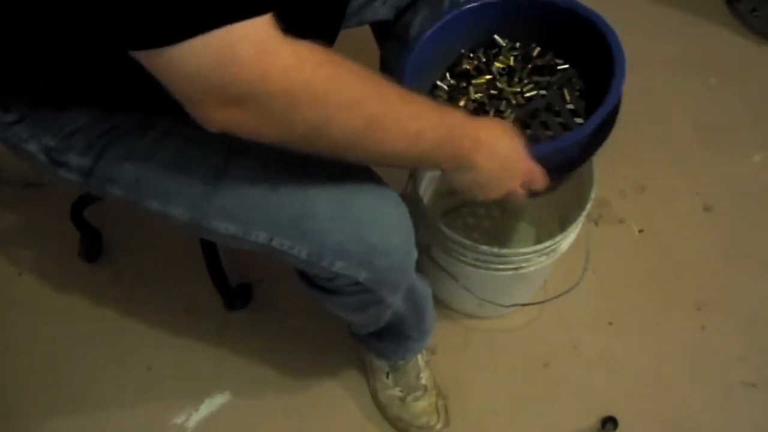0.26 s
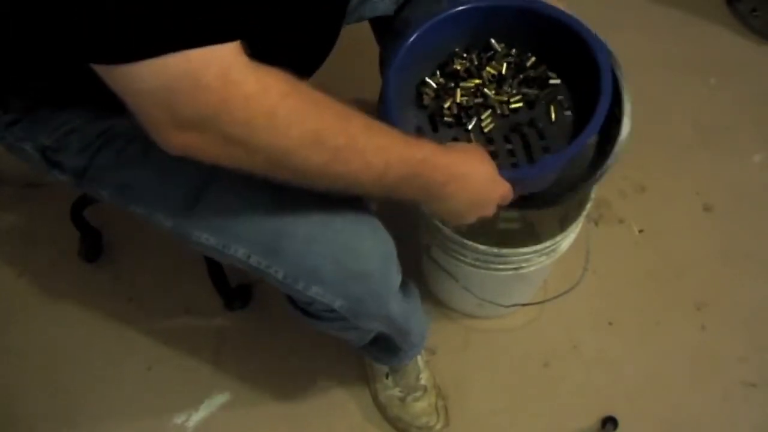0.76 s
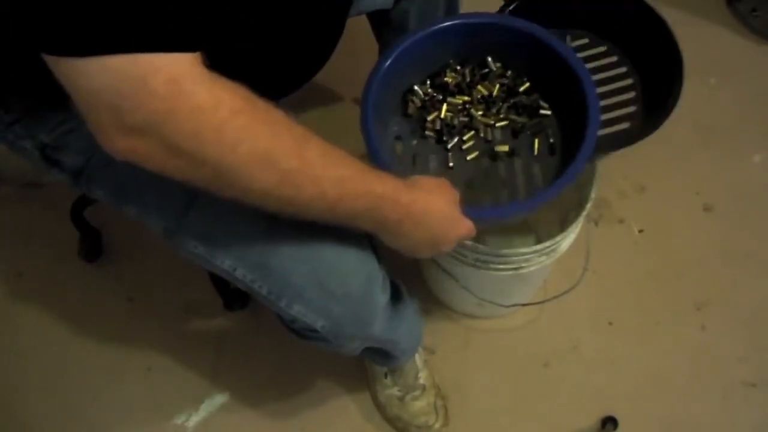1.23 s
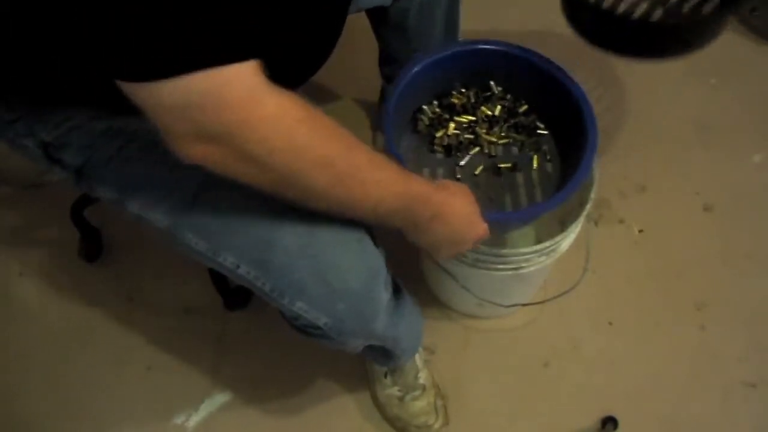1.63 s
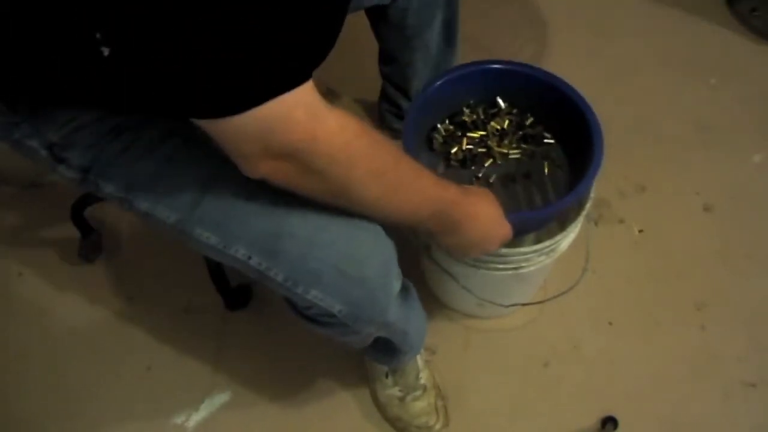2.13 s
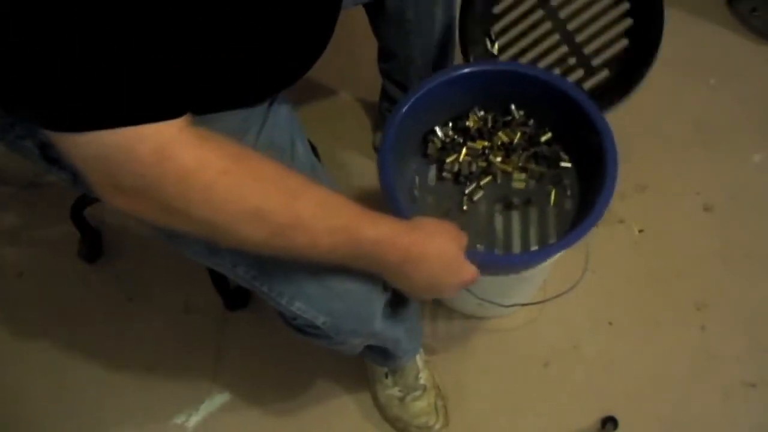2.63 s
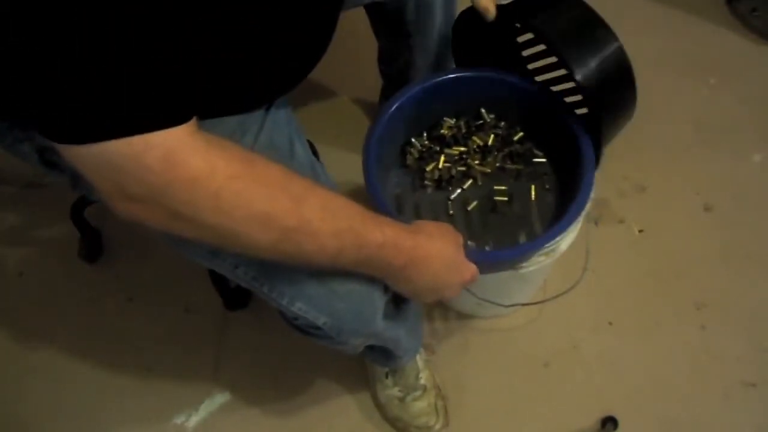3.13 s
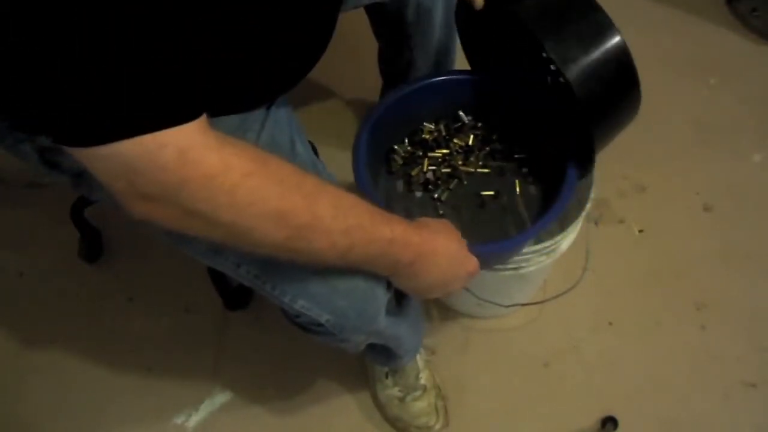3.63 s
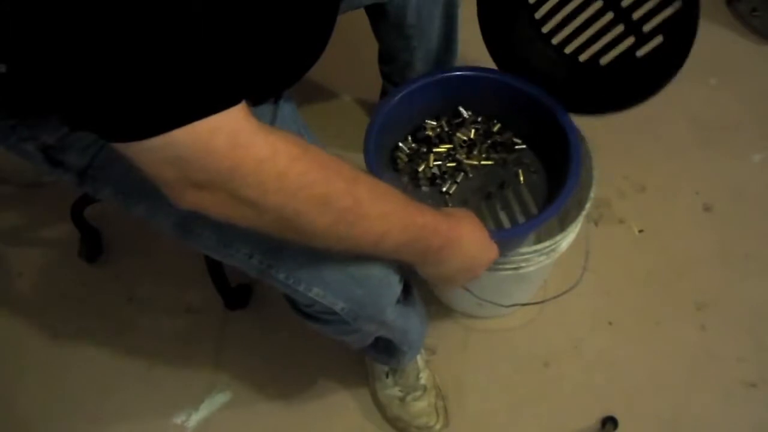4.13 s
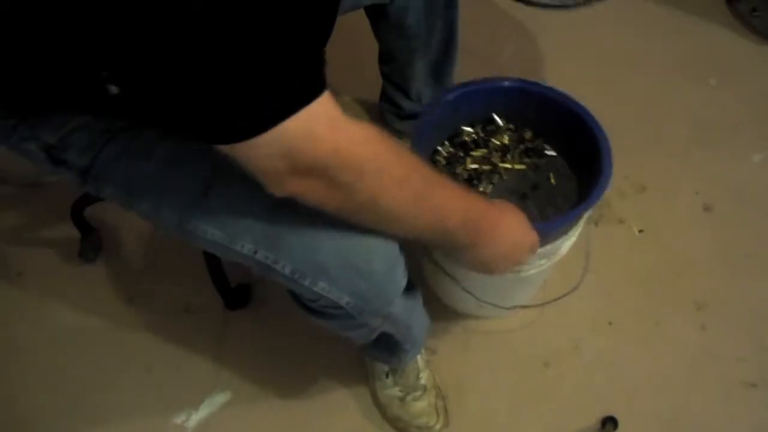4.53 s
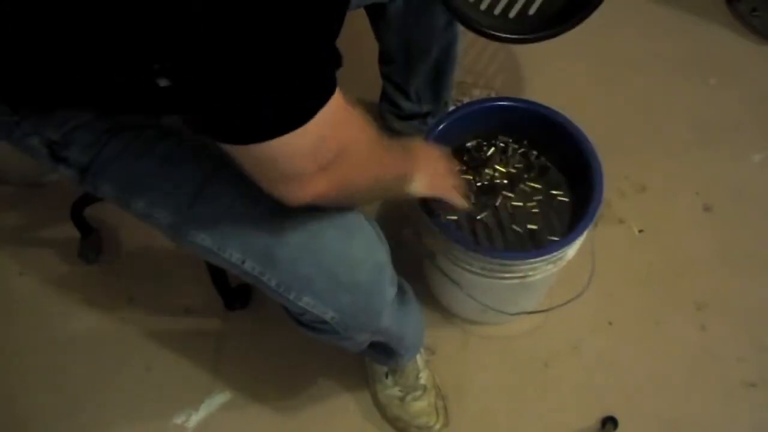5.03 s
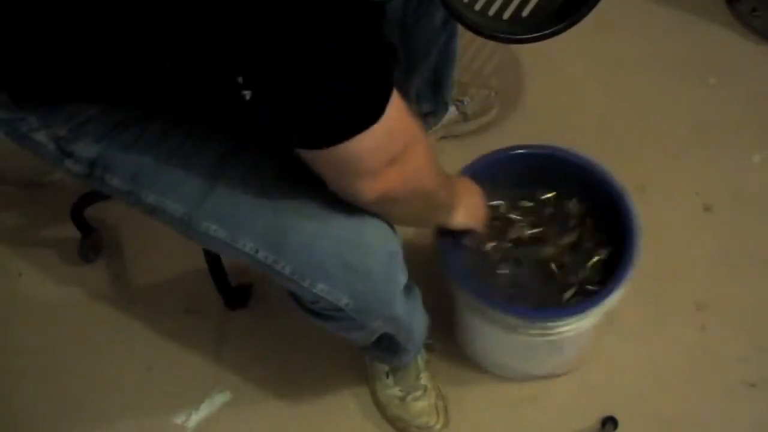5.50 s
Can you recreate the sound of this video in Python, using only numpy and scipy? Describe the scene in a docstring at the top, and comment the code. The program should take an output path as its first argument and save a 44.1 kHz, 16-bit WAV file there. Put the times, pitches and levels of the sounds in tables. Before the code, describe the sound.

Close stereo sound in a small, lightly echoing room: brass cartridge cases in a hard plastic tray over a plastic bucket. From 0 to 1 s, light, crisp rattling with separate clacks and bright ticks, ending in a high ring. Around 1.0 to 1.7 s it nearly stops, with only a few faint clinks. At about 1.8 s a loud, hollow double knock brings a burst of clatter, then weaker taps until 2.2 s. Another lull follows, with sparse ticks and thin ringing. From 2.8 to 4.1 s a long, dense rattle runs, sharp at first, then lower and boomier, with bucket knocks, soft floor bumps and a short scrape near 3.8 s. A pause follows to 4.5 s. Small scrapes lead to a hard clack at 4.7 s, then cases jingle and tumble with hollow thuds, brightening and swelling from 5.4 s and still rattling at the cut near 5.8 s.

```python
"""Brass cases in a plastic tray

Brass cartridge cases rattle in a hard plastic tray that is tipped, knocked and set down on a bucket in a small room.
Each jolt throws a shower of tiny impacts that excite decaying modes of tray, bucket and thin case walls, and a
broadband crack; sliding sustains the hail between jolts. Clinks, high throbbing rings, two faint thin whines,
floor bumps and rim scrapes join in over a faint hush, and two close microphones hear it all."""
import sys
import numpy as np
from scipy import signal
from scipy.fft import rfft, irfft, next_fast_len
from scipy.io import wavfile

SR = 44100
rng = np.random.default_rng(int(sys.argv[2]) if len(sys.argv) > 2 else 0)


def digitize_waveform(pressure):
    """Quantize a signal to 16-bit integers and store it at the path in sys.argv[1].

    Rows of a 2-D input are taken as channels; values are limited to [-1, 1].
    """
    field = np.atleast_2d(pressure).T
    bounded = np.clip(field, -1, 1)
    quanta = np.round(bounded * 32767).astype(np.int16)
    wavfile.write(sys.argv[1], SR, quanta)


N = 254016
TIME = np.arange(N) / SR  # s
SIZE = next_fast_len(N + SR)  # samples in a spectrum, with room for a 1 s echo
HZ = np.arange(SIZE // 2 + 1) * SR / SIZE
LEFT_RIGHT = np.array([[1], [-1]])


def undb(db):
    """Logarithmic level: decibels to amplitude gain."""
    return 10 ** (np.asarray(db) / 20)


def along(table, column=1):
    """Logarithmic pitch scale: one column of a table by frequency, interpolated at every frequency."""
    table = np.transpose(table)
    return np.interp(np.log(HZ + 1), np.log(table[0]), table[column])


def over_time(table, t):
    """Linear interpolation: every column of a table by time, read at the times t."""
    s, *columns = np.transpose(table)
    return [np.interp(t, s, column) for column in columns]


def sides(pan_db):
    """Level-difference stereo: left and right gains of a place, given left minus right."""
    return undb(LEFT_RIGHT * pan_db / 2)


def ring(x, hz, t60):
    """Damped resonance: every impact starts a wave that falls 60 dB in t60 seconds."""
    r = np.exp(-np.log(1000) / (t60 * SR))
    return signal.lfilter([1, 0, -1], [1, -2 * r * np.cos(2 * np.pi * hz / SR), r * r], x) / 2


def band(x, hz, width):
    """Heavily damped resonance: a broad pass band with steep sides."""
    edges = [hz - width / 2, hz + width / 2]
    return signal.sosfilt(signal.butter(2, edges, "bandpass", fs=SR, output="sos"), x)


def radiated(x, order, hz):
    """Radiation limit: a body small against the wavelength radiates little below hz."""
    return signal.sosfilt(signal.butter(order, hz, "highpass", fs=SR, output="sos"), x)


def impacts(per_s, scatter_db):
    """Random point process: one-sample impacts of uneven size and either sign, rms 1."""
    happens = rng.random(N) < per_s / SR
    size = undb(scatter_db * rng.standard_normal(N))
    x = happens * rng.choice([-1, 1], N) * size
    return x / x.std()


def unit(body):
    """Impulse-response energy: scale that brings a body to rms 1 under a steady hail of rms 1."""
    tick = np.zeros(SR // 2)
    tick[0] = 1
    return 1 / np.sqrt(np.sum(body(tick) ** 2))


def struck(force, hz, t60, per_s, knock=0):
    """Modal excitation: a mode hit at its own random moments, and by given knocks."""
    def mode(x):
        return ring(x, hz, t60)
    return unit(mode) * mode(force * impacts(per_s, scatter_db=2.0) + knock)


def patchy(depth_db, per_s):
    """Random modulation: a slowly wandering gain with per_s random turning points a second."""
    knots = rng.standard_normal(int(per_s * N / SR) + 2)
    return undb(depth_db * np.interp(np.arange(N) * per_s / SR, np.arange(len(knots)), knots))


# left-right correlation of echo and hush: pitch_hz, likeness (0 to 1)
LIKENESS_BY_PITCH = [(60, 0.95), (630, 0.93), (1370, 0.98), (3010, 0.81), (6580, 0.16), (14400, 0.15)]


def pair_of_noises():
    """Interchannel coherence: spectra of two noises, alike in the bass and nearly unrelated in the treble."""
    mid, side = rfft(rng.standard_normal((2, SIZE)))
    likeness = np.clip(along(LIKENESS_BY_PITCH), 0, 1)
    return np.sqrt((1 + likeness) / 2) * mid + np.sqrt((1 - likeness) / 2) * side * LEFT_RIGHT


# relative noise density of the hush: pitch_hz, density_db (per Hz)
HUSH_SPECTRUM = [(24, -57.5), (40, -4.5), (372, -13), (565, -12.5), (2170, -26.5), (2460, -13.5),
                 (3140, -25), (13000, -28), (14000, -24.5)]
# level of the hush, which sinks after the loud knocks: start_s, level_db
HUSH_LEVEL = [(0, -55), (1.7, -58.5), (2.5, -64.5), (4.298, -68.5), (4.47, -77.5), (5.76, -82)]


def hush():
    """Spectrally shaped noise: a faint, steady background that slowly sinks."""
    noise = irfft(pair_of_noises() * undb(along(HUSH_SPECTRUM)), SIZE)[:, :N]
    return undb(over_time(HUSH_LEVEL, TIME)[0]) * noise / noise.std()


# plastic ribs of the tray: pitch_hz, relative level_db, t60_s
TRAY_RIBS = [(937, 3.5, 0.016), (1122, 8.5, 0.0091), (1340, 4, 0.0083), (1514, 1.5, 0.057),
             (1712, 7.5, 0.0088), (1875, -1.5, 0.026), (2030, -4, 0.02), (2126, 3.5, 0.0089),
             (2393, -0.5, 0.059), (2510, 2, 0.021), (2642, -3, 0.16), (2790, 4, 0.0091), (2948, -1, 0.025),
             (3353, -2, 0.0088), (3520, 6.5, 0.0043), (3790, -3.5, 0.017), (4155, -1, 0.033),
             (4420, -3.5, 0.021), (4910, 2.5, 0.0046), (5460, -2, 0.015), (5960, -8, 0.021),
             (7160, -11.5, 0.035), (7160, -10, 0.037)]


def ribs(hz, below_octaves):
    """Spectral spread of excitation: share of power that each rib takes from a clack of pitch hz."""
    near_octaves, above_octaves, far_share = .22, 2.9, 0.95
    octaves = np.log2(np.array(TRAY_RIBS)[:, :1] / hz)
    near = np.exp(-.5 * (octaves / near_octaves) ** 2)
    reach = np.where(octaves < 0, below_octaves, above_octaves)
    share = near + far_share * np.exp(-.5 * (octaves / reach) ** 2)
    return share / share.sum(axis=0)


def tray(forces, knocks):
    """Modal synthesis: ribs clack at their own pitches and places, now this one busy, now that."""
    out = np.zeros((2, N))
    for (hz, db, t60), force, knock in zip(TRAY_RIBS, forces, knocks):
        place = sides(2.5 * rng.standard_normal())
        out += place * undb(db) * struck(force * patchy(4, per_s=40), hz, t60, per_s=280, knock=knock)
    return out


# how tray and load lie: start_s, slide clack pitch_hz, slide boom_db, slide crack_db, reach below a clack in octaves,
# drive of the upper bucket modes_db, thump relative to boom_db, case ring relative to crack_db
LIE_OF_LOAD = [(0, 2350, -35, -4, 0.34, 2, 1, 6), (.45, 2240, -50, -3, 0.88, 9.5, -3, -2.5),
               (.7, 2200, -48.5, -21, 0.76, -15.5, -11, 0), (.95, 2250, -61, -12, 0.75, -15, -3, 4),
               (1.5, 2380, -23, -4.5, 0.37, -13, 1, -6), (1.8, 1700, -17, -4.5, 0.74, 2.5, -8.5, -2),
               (2.2, 1605, -10, -33, 0.41, -2.6, -13.5, -24), (2.6, 2450, -48, -15.5, 0.23, -0.5, -6, -1),
               (2.82, 2100, -49, -25, 0.45, 1, -13, 5.5), (3.05, 2060, -35, 1, 0.41, -25, -3, 4),
               (3.3, 1720, -34, -9, 0.43, 1, -9, -2), (3.5, 1470, -3, -43, 0.48, 6, -11, -3),
               (3.65, 1717, -11, -9, 1, -3.5, -8.5, 0.5), (4.1, 1726, -7.5, -10.5, 0.38, -0.5, -5, 0.5),
               (4.5, 1160, -4, -34, 0.71, -7.5, -3.5, 6.5), (4.7, 2600, -13, 1, 0.65, -15.5, 0.5, 11),
               (4.95, 2300, -31, -1, 0.42, 6.5, -29, 4.5), (5.05, 1950, -15, -8, 0.69, 4, 1.5, -7),
               (5.3, 1920, -13.5, -1.5, 0.69, -4.5, -5, 9.5), (5.76, 2190, -19.5, -0.5, 1, -1.5, -2, 7.5)]


def shares(t, hz, ribs_db, boom_db, crack_db):
    """Power partition among ribs, thump, bucket, crack and cases; thump follows boom, ring follows crack."""
    *_, below_octaves, _, thump_db, ring_db = over_time(LIE_OF_LOAD, t)
    rest_db = np.array([boom_db + thump_db, boom_db, crack_db, crack_db + ring_db]).reshape((4, -1))
    return np.vstack([ribs(hz, below_octaves) * undb(ribs_db) ** 2, undb(rest_db) ** 2])


# sliding and rolling: start_s, relative level_db
SLIDING = [(0, -32), (.08, -34.5), (.14, -35.5), (.3, -28), (.58, -35), (.74, -44), (.83, -30.5),
           (.99, -34), (1.07, -83), (1.43, -76), (1.54, -41), (1.7, -85), (1.81, -24), (1.99, -37.5),
           (2.11, -68), (2.2, -35), (2.3, -63), (2.57, -73.5), (2.65, -47), (2.81, -47), (2.89, -32.5),
           (3.03, -31.5), (3.15, -39.5), (3.27, -35), (3.38, -34.5), (3.54, -54), (3.63, -26.5),
           (3.95, -30.5), (4.19, -61), (4.46, -80), (4.53, -63.5), (4.6, -76), (4.68, -20), (4.8, -32.5),
           (5.0, -42.5), (5.16, -42.5), (5.23, -31.5), (5.41, -33), (5.5, -32), (5.6, -22), (5.72, -21),
           (5.76, -17)]
# jolts: start_s, relative level_db, clack pitch_hz, bucket boom_db, hard crack_db, shower decay_s
# (boom and crack are relative to the jolt's level)
JOLT_EVENTS = [(0.028, -35, 1910, -43, 8, 0.024), (0.045, -31.5, 2400, -40, 9, 0.054),
               (0.17, -14.5, 3150, -44, -13, 0.012), (0.221, -23, 3310, -44, 1, .02),
               (0.226, -16.5, 3380, -47, 2.5, 0.019), (0.262, -26, 3100, -43, -21, 0.022),
               (0.284, -30, 3140, -29, -11, .01), (0.313, -19, 3620, -40, 6.5, 0.016),
               (0.36, -32, 2460, -46.5, 10.5, 0.013), (0.397, -30, 3570, -47, 6, 0.016),
               (0.468, -24, 3710, -53, 6.5, 0.0089), (0.53, -35.5, 1390, -44, 9.5, 0.0091),
               (0.563, -21.5, 2980, -47, -5.5, 0.021), (0.668, -27.5, 2030, -40, -25, 0.029),
               (0.764, -21.5, 2510, -46, -5.5, 0.027), (0.771, -14, 3150, -46, -10.5, 0.024),
               (0.845, -16, 2730, -50, -8.5, 0.0072), (0.881, -24, 2750, -53, -33, 0.0031),
               (0.913, -17.5, 4180, -45, -2.3, 0.021), (1.146, -51.5, 2010, -39, -24, 0.011),
               (1.227, -33, 3140, -45, -24, 0.0084), (1.244, -32.5, 2780, -42, -13, 0.027),
               (1.457, -27, 2580, -30, 1.5, 0.0086), (1.476, -32, 2560, -42, -0.5, 0.021),
               (1.496, -28, 2520, -50, -1, 0.012), (1.519, -28, 1830, -41, 0, 0.0069),
               (1.572, -26.5, 2880, -55, -0.5, 0.005), (1.581, -24, 2280, -47, -6.5, 0.031),
               (1.768, -20.5, 2205, -8.5, -11, 0.024), (1.776, -10, 2140, -19, -8.5, 0.025),
               (1.788, -5, 1610, -10.5, -40, 0.0059), (1.839, -6, 1690, -11, -3, 0.01),
               (1.842, -7.5, 1770, -22, -5.5, 0.028), (2.032, -29.5, 2400, -20.5, -44, 0.0086),
               (2.056, -27, 2760, -30, -44.5, 0.021), (2.129, -25, 1710, -23, -1.5, 0.017),
               (2.136, -16, 1660, -9.5, -36, 0.03), (2.259, -37.5, 1340, -1.5, -41, 0.0046),
               (2.41, -52, 2400, -43, -10, 0.011), (2.526, -45.5, 1980, -23.5, -2.5, 0.013),
               (2.59, -29.5, 2920, -48, -8, 0.026), (2.591, -34, 2500, -47, -6, .006),
               (2.7, -37, 3540, -37, -5, .012), (2.744, -40, 2380, -48, -3.5, 0.019),
               (2.77, -33.5, 2370, -46, -11, 0.0086), (2.821, -21, 2600, -44, -6.5, 0.037),
               (2.863, -19, 2110, -52, -12, 0.0086), (2.895, -9, 2130, -32.5, -9, 0.015),
               (2.997, -11.5, 1730, -36, -13, 0.015), (3.027, -12.5, 2400, -34, -7.5, 0.051),
               (3.099, -16.5, 2290, -44, -15, 0.022), (3.187, -18, 1700, -20.5, -9, 0.012),
               (3.214, -28, 1670, -12, -24, 0.0086), (3.301, -16, 1800, -30, -9.5, 0.011),
               (3.357, -5.5, 1470, -15.5, -16.5, 0.0086), (3.369, -24, 1530, -15, -8, 0.031),
               (3.422, -31.5, 1320, -12, -22, 0.026), (3.485, -32.5, 1320, -9, -25, 0.007),
               (3.548, -19, 1650, -16, -2, 0.06), (3.585, -16, 2120, -21, -21, 0.041),
               (3.589, -16.5, 1320, -11, -6.5, 0.052), (3.656, -19, 1610, -8, -2, 0.03),
               (3.685, -11, 1020, -19.5, -4, 0.014), (3.777, -11.5, 1610, -11, -9.5, 0.009),
               (3.823, -24, 1290, -10.5, -6, 0.0095), (3.841, -10.5, 1000, -25.5, -7, 0.0097),
               (3.897, -19, 4020, -25, -4, 0.048), (3.921, -31, 1210, -8.5, -4.5, 0.016),
               (3.926, -18, 1270, -13.5, -4, 0.023), (4.087, -21.5, 2100, -20.5, -6.5, 0.0088),
               (4.091, -16, 1830, -19, -13.5, 0.037), (4.491, -44, 4250, -35, -9, 0.041),
               (4.511, -36.5, 2870, -8.5, -10.5, 0.17), (4.617, -27.5, 2570, -31, -2, 0.014),
               (4.623, -22.5, 2580, -37, 1.5, 0.037), (4.632, -20, 2760, -20, -11, 0.043),
               (4.646, -15.5, 2500, -13, -9, 0.017), (4.711, -15.5, 2700, -19.5, -14, 0.012),
               (4.685, -4.5, 2750, -19.5, -4, 0.0089), (4.904, -23.5, 2370, -15, -0.5, 0.014),
               (4.994, -31, 1520, -14, -7, 0.016), (5.041, -20.5, 2000, -19, -9, 0.036),
               (5.066, -18.5, 2100, -9, -31, 0.0023), (5.184, -18.5, 2050, -13, -4, 0.01),
               (5.279, -13, 1760, -14, -7.5, 0.005), (5.302, -23, 1760, -21, -11, 0.0066),
               (5.397, -20, 1920, -23, -4.5, 0.17), (5.448, -17.5, 2330, -16.5, -22, 0.064),
               (5.566, -17, 4340, -7.5, 2.5, 0.028), (5.632, -18.5, 2200, -12.5, 0, 0.046),
               (5.69, -23, 2200, -6, -6, .01), (5.745, -25, 1800, -6, -3, 0.023)]


def excitation():
    """Addition of powers: the slide's hail plus a swelling, dying shower per jolt, and the first knocks."""
    swell_share = 0.079  # swell time constant as a share of the decay
    ribs_db, rib_scatter_db, first_db = -4, 1.5, 7.5
    hz, boom_db, crack_db, *_ = over_time(LIE_OF_LOAD, TIME)
    power = shares(TIME, hz, 0, boom_db, crack_db) * undb(over_time(SLIDING, TIME)[0]) ** 2
    scatter = rib_scatter_db * rng.standard_normal((len(JOLT_EVENTS), len(TRAY_RIBS), 1))
    knocks = np.zeros((len(TRAY_RIBS), N))
    for (at, db, hz, boom_db, crack_db, decay), spot_db in zip(JOLT_EVENTS, scatter):
        i = int(at * SR)
        u = TIME[i:i + SR // 4] - TIME[i]
        # the crowd lands just behind the first case, the last ones bounce after it
        shower = (1 - np.exp(-u / (swell_share * decay))) * np.exp(-u / decay)
        share = shares(at, hz, ribs_db + spot_db, boom_db, crack_db) * undb(db) ** 2
        power[:, i:i + len(u)] += share * shower ** 2
        # the first case knocks all ribs at once
        knocks[:, i] = np.sqrt(share[:len(TRAY_RIBS), 0]) * undb(first_db)
    return np.sqrt(power), knocks


# broad bands of the hard crack: pitch_hz, width_hz, relative level_db
CRACK_BANDS = [(3900, 6200, 6.5), (5020, 4100, 19), (6300, 2200, 18), (7030, 2800, -31.5),
               (10300, 3300, 9.5)]


def crack(x):
    """Broadband impact noise: brass striking brass and plastic."""
    return sum(undb(db) * band(x, hz, width) for hz, width, db in CRACK_BANDS)


# thin brass case walls: pitch_hz, relative level_db, t60_s
CASE_MODES = [(6740, -8.5, 0.077), (7560, -4.5, 0.01), (8020, -8, 0.034), (7950, -3, 0.022),
              (8580, -6, .03), (8300, 1, 0.027), (9300, -15, 0.055), (8770, -1.5, 0.026),
              (8800, -29, 0.032), (9210, -1, 0.038), (10320, 0, 0.039), (9700, -0.5, 0.027),
              (10880, -1, 0.035), (11600, -0.5, 0.036), (9800, -20.5, 0.068), (11350, -0.5, 0.085),
              (12200, 2.5, 0.04), (11200, -0.5, 0.038), (12380, -9.5, .04), (13000, -3.5, .06),
              (13100, -1.5, .06), (13500, -22.5, .06), (14000, -40, .06)]


def cases(force):
    """Modal synthesis with detuning: two cases of every size ring, each at its own place and pitch."""
    pan_scatter_db, pitch_scatter = 5, .012  # pitch scatter as a share of the pitch
    chance = rng.standard_normal((2 * len(CASE_MODES), 2))
    out = np.zeros((2, N))
    for (hz, db, t60), (place, tune) in zip(CASE_MODES * 2, chance):
        tuned_hz = hz * (1 + pitch_scatter * tune)
        out += sides(pan_scatter_db * place) * undb(db) * struck(force, tuned_hz, t60, per_s=84)
    return out


SEATED_S = 4.45  # from here on the tray sits in the bucket's mouth
# whole-bucket modes: pitch_hz
THUMP_PITCHES = [180, 222, 270, 340]
# for each of these pitches: relative level_db, t60_s, change once the tray is seated_db
THUMP_MODES = [(-11.5, 0.065, 8), (-7, 0.081, -7), (-5, 0.038, -1.5), (-11.5, 0.0073, 8.5)]


def thump(x):
    """Low-order modes: the bucket as a whole jarred against the floor."""
    seated = np.arange(len(x)) / SR > SEATED_S
    return sum(undb(db + seated_db * seated) * ring(x, hz, t60)
               for hz, (db, t60, seated_db) in zip(THUMP_PITCHES, THUMP_MODES))


# air column and walls of the bucket: pitch_hz
BUCKET_PITCHES = [400, 462, 530, 646, 676, 705, 764, 920, 1021, 1194, 1324, 1560, 1679, 1761, 2170, 603,
                  1250, 1380, 1615]
# for each of these pitches: relative level_db, t60_s, change once the tray is seated_db
BUCKET_MODES = [(-14, 0.0058, 16.5), (2, 0.11, -3.5), (3.5, 0.028, 0.5), (4, 0.16, -4), (0.5, 0.13, -2.5),
                (-6.5, 0.044, 10.5), (-5.5, 0.28, -1), (-2.5, 0.059, 1), (-4, 0.11, -7), (-12, 0.09, -1),
                (-2.5, 0.14, -17), (-2.5, .08, -3), (4, 0.14, -15.5), (-19.5, 0.078, 6), (-1, 0.065, 4),
                (-16.5, 0.028, 12), (-16.5, .1, -10.5), (-13.5, 0.12, -1), (-10, 0.24, -3)]


def bucket(x):
    """Coupled cavity and wall modes: struck at ever-changing spots, the upper ones driven as the load lies."""
    upper = x * undb(over_time(LIE_OF_LOAD, TIME)[4])
    out = np.zeros(N)
    for hz, (db, t60, seated_db) in zip(BUCKET_PITCHES, BUCKET_MODES):
        force = upper if hz > 600 else x
        gain = undb(db + seated_db * (TIME > SEATED_S))
        out += gain * ring(patchy(3, per_s=20) * force, hz, t60)
    return out


# reverberation of the room: pitch_hz, t60_s, echo level_db
ROOM_WALLS = [(153, 0.076, 1.5), (400, 0.25, -7), (1000, 0.35, -3.5), (2760, 0.36, -13), (7280, 0.14, -7),
              (14000, 0.36, -2.5)]


def room():
    """Diffuse reverberation: response of direct sound plus a noise echo that decays octave by octave."""
    delay_s = 0.0033
    noise, t, echo = pair_of_noises(), np.arange(SR) / SR, np.zeros((2, SIZE))
    t60 = along(ROOM_WALLS)
    for hz in 62.5 * 2. ** np.arange(9):
        octave = np.cos(np.pi / 2 * np.clip(np.log2((HZ + 1) / hz), -1, 1)) ** 2
        fade = 1000. ** (-t / t60[int(hz * SIZE / SR)]) * (t > delay_s)
        echo[:, :SR] += irfft(noise * octave, SIZE)[:, :SR] * fade / np.sqrt(np.sum(fade ** 2))
    return 1 + undb(along(ROOM_WALLS, column=2)) * rfft(echo)


# one spot of tray or bucket chattering under a few cases: start_s, pitch_hz, relative level_db, length_s
CLINK_EVENTS = [(0.026, 2850, -35, 0.044), (0.047, 2400, -36, 0.021), (.075, 3450, -26.5, 0.029),
                (0.076, 1920, -38, 0.047), (0.168, 1870, -26.5, 0.023), (.225, 3780, -28, 0.048),
                (0.227, 3095, -22, 0.062), (0.232, 6300, -28, .03), (.40, 3520, -28.5, 0.013),
                (0.541, 5670, -26.5, 0.021), (0.58, 2820, -54, 0.053), (0.627, 2490, -37.5, 0.065),
                (.63, 4950, -40, 0.09), (0.661, 1990, -34.5, 0.051), (.23, 800, -33.5, .06),
                (0.769, 2260, -28, 0.079), (0.885, 2650, -23, 0.015), (0.941, 1950, -36.5, 0.11),
                (1.228, 3050, -35.5, 0.026), (1.458, 2660, -40, 0.02), (1.799, 662, -16, 0.015),
                (1.836, 674, -27, 0.022), (1.575, 1830, -39, 0.061), (1.59, 2580, -38, 0.04),
                (1.795, 1666, -21.5, 0.081), (1.849, 1688, -8, 0.016), (1.88, 1676, -29, 0.09),
                (1.782, 860, -23, 0.022), (2.149, 648, -32.5, 0.09), (2.135, 1020, -30.5, 0.044),
                (2.14, 1650, -35, .05), (2.26, 1273, -33.5, 0.011), (2.027, 2330, -34, 0.023),
                (2.593, 1885, -44.5, 0.077), (2.62, 2400, -46, 0.079), (2.741, 2340, -43, 0.096),
                (2.659, 1860, -51.5, 0.13), (2.898, 1897, -21.5, 0.062), (2.90, 2330, -18, 0.019),
                (2.931, 1135, -32, .04), (3.001, 1730, -27, 0.017), (3.034, 2350, -21, 0.032),
                (3.041, 1875, -25, 0.091), (3.098, 2330, -23.5, 0.018), (3.2, 1690, -26.5, 0.045),
                (3.356, 675, -17, 0.014), (3.363, 1316, -16, 0.012), (3.374, 1760, -22.5, 0.026),
                (3.298, 1230, -28.5, 0.062), (3.301, 1794, -24, 0.017), (3.424, 1288, -32, 0.2),
                (3.546, 656, -35.5, 0.2), (3.683, 1012, -17.5, 0.023), (4.099, 1680, -31.5, 0.11),
                (4.114, 698, -36.5, 0.09), (4.204, 688, -62.5, 0.21), (5.277, 1790, -25, .02),
                (4.701, 350, -28.5, .015), (4.536, 1640, -52, 0.026), (4.686, 2480, -14, 0.032),
                (4.689, 3660, -15.5, 0.018), (4.71, 2730, -30, 0.13), (4.772, 2560, -39, .1),
                (4.635, 1000, -28, 0.046), (4.905, 2450, -35, 0.017), (5.072, 1290, -31, 0.033),
                (5.45, 2000, -30, 0.02), (5.563, 465, -18.5, 0.016), (5.621, 1474, -26, 0.034),
                (5.634, 3750, -23, 0.074), (5.662, 2580, -32, 0.023), (5.737, 1200, -25, 0.014),
                (5.74, 4060, -28, 0.018)]


def clinks():
    """Repeated excitation of one mode: a first tap, then a chatter of random taps while the clink lasts."""
    cycles = 58  # a clink falls 60 dB in this many cycles, so low ones last longer
    first_tap_db = 22.5
    out, u = np.zeros(N + SR // 4), np.arange(SR // 4) / SR
    chance = rng.standard_normal((len(CLINK_EVENTS), SR // 4))
    for (at, hz, db, length), taps in zip(CLINK_EVENTS, chance):
        def mode(x):
            return ring(x, hz, cycles / hz)
        i = int(at * SR)
        swell = np.sqrt(np.sin(np.pi * np.clip(u / length, 0, 1) ** .5).clip(0))
        # the cube makes a few taps stand out
        force = swell * taps ** 3 / 4 + undb(first_tap_db) * (u == 0)
        out[i:i + len(u)] += undb(db) * unit(mode) * mode(force)
    return out[:N]


# high rings of single cases, and two faint, long, thin whines near 12.8 kHz:
# start_s, pitch_hz, relative level_db, t60_s, left minus right_db
HIGH_TONES = [(0.113, 11200, -25, 0.34, 0), (0.4, 8950, -34, 0.34, 6), (0.539, 10090, -20, 0.058, 2),
              (0.55, 11436, -34, 0.26, -1), (0.68, 11510, -29, 0.24, 3), (0.959, 13100, -10, 0.22, 7),
              (1.023, 13200, -16, 0.15, 10), (1.229, 10900, -37, 0.16, 0), (1.264, 11510, -20, 0.25, 3.5),
              (1.275, 11600, -37, 0.56, 2), (1.285, 12830, -44, 4, -15), (1.6, 11272, -51, 1.1, 4),
              (1.9, 11350, -34, 0.2, 0), (2.341, 8600, -49.5, 0.26, 5.5), (2.362, 8800, -37.5, 0.24, 3.5),
              (2.6, 11750, -43, 0.67, 1), (2.662, 13347, -34, 0.46, -5), (2.728, 10940, -29, 0.16, 2),
              (2.75, 11800, -27.5, 0.49, 2), (2.751, 11570, -31.5, 1.5, 8), (2.996, 11060, -16, 0.57, 2),
              (3.102, 11170, -32, 0.41, 5), (3.318, 11850, -31, 0.32, 1), (3.452, 11800, -38.5, 0.34, 5),
              (3.592, 11189, -27, 0.41, -5), (3.68, 11070, -21.5, 0.36, 2), (3.809, 10120, -13.5, 0.3, 3.5),
              (3.821, 11159, -25, 0.68, 3), (3.919, 10930, -24, 0.32, 8), (3.975, 13100, -31, 0.5, 4),
              (3.985, 10070, -28.5, 0.3, 3), (4.131, 10020, -32, 0.25, 8), (4.15, 11800, -33.5, 0.21, 6),
              (4.15, 12855, -57, 2.5, -14), (4.7, 8200, -17, 0.33, 7), (4.775, 11700, -25, 0.23, -2),
              (4.93, 11100, -33, 0.12, 4), (5.187, 11600, -25, 0.15, 1), (5.417, 11340, -24.5, 1.2, 8),
              (5.454, 8400, -19.5, 0.23, 4), (5.482, 10000, -21, 0.21, 2), (5.599, 8440, -20.5, 0.76, 4),
              (5.629, 11600, -18, 0.75, 0)]


def high_tones():
    """Beating of close partials: several near pitches, as an uneven case wall gives, make a high tone throb."""
    spread_hz, side_share, rise_s = 35, .5, 0.0062
    out, t = np.zeros((2, N)), np.arange(SR) / SR  # no tone lasts beyond 1 s
    chances = rng.standard_normal((len(HIGH_TONES), 2, 3, 1))
    for (at, hz, db, t60, pan_db), (tune, phase) in zip(HIGH_TONES, chances):
        i = int(at * SR)
        u = t[:min(N - i, int(t60 * SR))]
        beats = np.sin(2 * np.pi * ((hz + spread_hz * tune) * u + phase)).sum(axis=0)
        tone = np.sin(2 * np.pi * hz * u) + side_share * beats
        envelope = (1 - np.exp(-u / rise_s)) * 1000. ** (-u / t60)
        out[:, i:i + len(u)] += sides(pan_db) * undb(db) * tone * envelope
    return out


# brief changes of level, nearly all dips: centre_s, length_s, change_db
LEVEL_DIPS = [(0.212, 0.0081, -6), (0.305, .01, -0.5), (1.21, .014, -5), (1.442, 0.011, 1),
              (2.116, 0.01, -8), (3.347, 0.0073, -1.5), (3.533, 0.014, -7), (3.774, 0.014, -5.5),
              (4.605, 0.011, -14)]


def dips():
    """Amplitude modulation: the overall level changes briefly, nearly always downward."""
    return undb(sum(db * np.exp(-(2 * (TIME - at) / length) ** 4) for at, length, db in LEVEL_DIPS))


# soft bumps of the bucket on the floor: start_s, relative level_db, swell_s
BUMP_EVENTS = [(1.782, -42, 0.011), (1.843, -37, 0.017), (2.146, -42.5, 0.009), (2.267, -61.5, 0.0071),
               (3.363, -50, 0.009), (3.564, -36.5, 0.01), (3.59, -36.5, 0.013), (3.686, -36.5, 0.01),
               (3.783, -38, 0.011), (3.852, -36.5, 0.014), (4.096, -36.5, 0.011), (4.165, -50.5, 0.0086),
               (4.503, -47, 0.005), (4.541, -43.5, 0.0067), (4.614, -51, 0.009), (4.657, -38.5, 0.0081),
               (4.689, -39, 0.0099), (4.753, -46, 0.0079), (5.043, -45, 0.0063), (5.063, -40, 0.0095),
               (5.184, -53, 0.012), (5.277, -39, 0.0039), (5.303, -47, 0.009), (5.563, -37.5, 0.0078)]


def bumps():
    """Soft-contact impulse: a push swells and dies in the bucket's bottom, with a deeper thud from the floor."""
    bottom_hz, pitch_scatter, bottom_db = 210.6, 0.05, 10
    floor_hz, floor_db = 106, -18.5  # level relative to the bottom
    out, u = np.zeros(N + SR // 4), np.arange(SR // 4) / SR
    chance = rng.standard_normal((len(BUMP_EVENTS), 3))
    for (at, db, swell), (tune, bottom_phase, floor_phase) in zip(BUMP_EVENTS, chance):
        i = int(at * SR)
        bottom = np.sin(2 * np.pi * (bottom_hz * (1 + pitch_scatter * tune) * u + bottom_phase))
        floor = undb(floor_db) * np.sin(2 * np.pi * (floor_hz * u + floor_phase))
        push = u / swell * np.exp(1 - u / swell)
        out[i:i + len(u)] += undb(db + bottom_db) * (bottom + floor) * push
    return out[:N]


# tray rim dragged on bucket rim: start_s, length_s, relative level_db, pitch_hz, width_hz
SCRAPE_EVENTS = [(3.798, .083, -25, 755, 776), (4.513, 0.064, -25, 628, 600), (4.543, .04, -31, 1060, 300)]


def scrapes():
    """Friction noise: rough, uneven contacts of rim on rim, heard through a broad resonance."""
    out = np.zeros(N)
    for at, length, db, hz, width in SCRAPE_EVENTS:
        drag = np.sqrt(np.sin(np.pi * np.clip((TIME - at) / length, 0, 1)).clip(0))
        out += undb(db) * band(drag * impacts(per_s=1200, scatter_db=8.0), hz, width)
    return out


def scene():
    """Superposition: the rattle fills the room; high tones, bumps and hush are added without its echo."""
    thump_db, bucket_db, cases_db = 5, -24, -19
    (*on_ribs, on_thump, on_bucket, on_crack, on_cases), knocks = excitation()
    hail = impacts(per_s=6000, scatter_db=2.5)
    # opposite signs left and right widen the crack
    wide_hail = hail + 0.24 * impacts(per_s=3000, scatter_db=1.5) * LEFT_RIGHT
    cracking = unit(crack) * crack(on_crack * patchy(1.8, per_s=120) * wide_hail)
    small = radiated(tray(on_ribs, knocks) + cracking, 4, 826)
    thumping = undb(thump_db) * unit(thump) * thump(on_thump * hail)
    booming = undb(bucket_db) * bucket(on_bucket * hail)
    large = radiated(thumping + booming, 3, 195)
    ringing = undb(cases_db) * cases(on_cases)
    rattle = small + large + ringing + clinks() + scrapes()
    in_room = irfft(rfft(rattle, SIZE) * room(), SIZE)[:, :N]
    return hush() + in_room + high_tones() + bumps()


# response of both microphones: pitch_hz, gain_db
MICROPHONE_RESPONSE = [(25, -49.5), (80, -20), (130, -16), (160, -15), (200, -11), (9000, -10),
                       (12000, -20), (14500, -29.5)]
# difference between the two: pitch_hz, left minus right_db
MICROPHONE_LEAN = [(60, 0), (200, -2.5), (1300, -1.5), (4260, -3), (7830, -1.5), (10000, 4.5),
                   (14400, -1.5)]


def record(dry):
    """Transducer response: deep bass and top are weakened, left and right differ, loud peaks saturate."""
    colour = undb(along(MICROPHONE_RESPONSE) + along(MICROPHONE_LEAN) / 2 * LEFT_RIGHT)
    heard = irfft(rfft(dry, SIZE) * colour, SIZE)[:, :N] * dips()
    rounded = np.tanh(1.204 * heard) / 1.2
    # steep upper limit at 14.8 kHz
    return signal.sosfilt(signal.ellip(10, .2, 80, 14800, fs=SR, output="sos"), rounded)


dry = scene()
out = record(dry)
digitize_waveform(out)
```